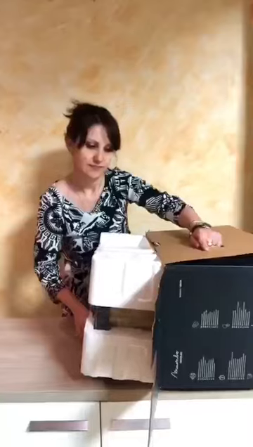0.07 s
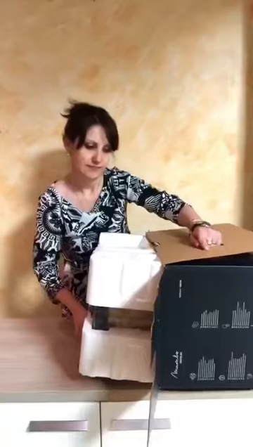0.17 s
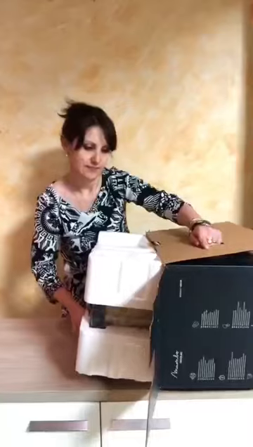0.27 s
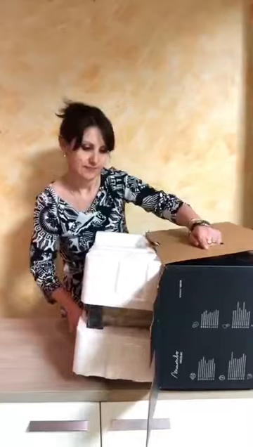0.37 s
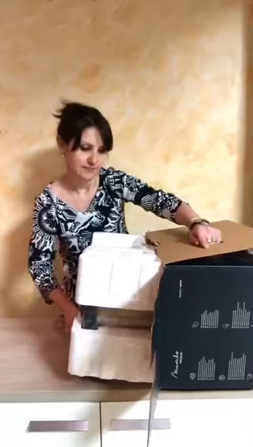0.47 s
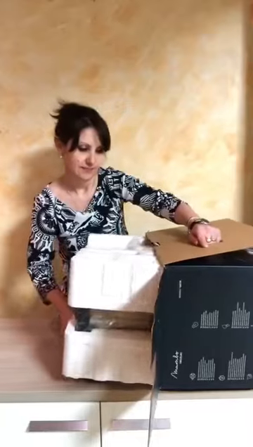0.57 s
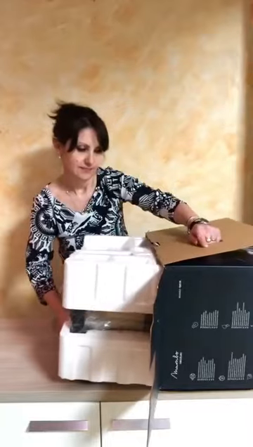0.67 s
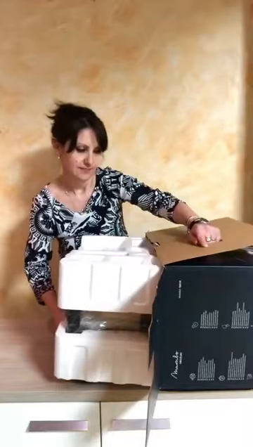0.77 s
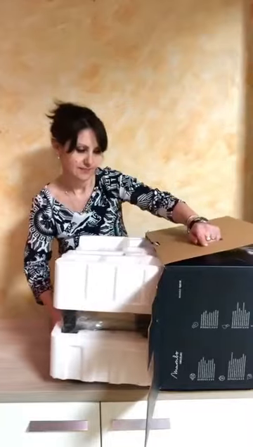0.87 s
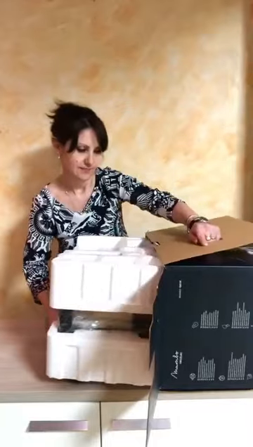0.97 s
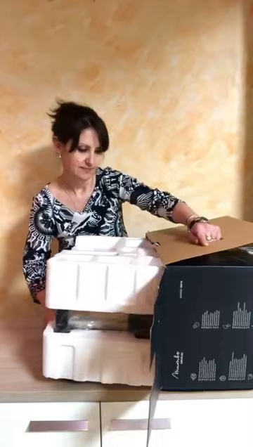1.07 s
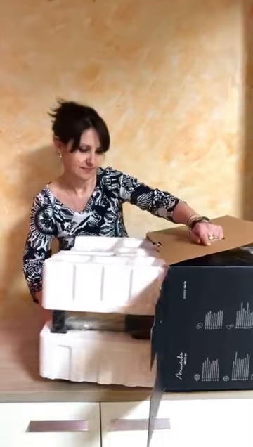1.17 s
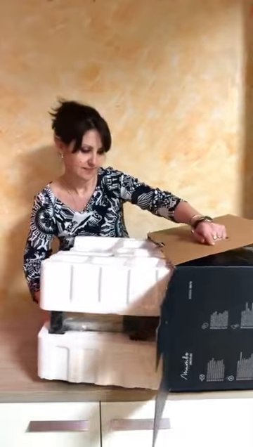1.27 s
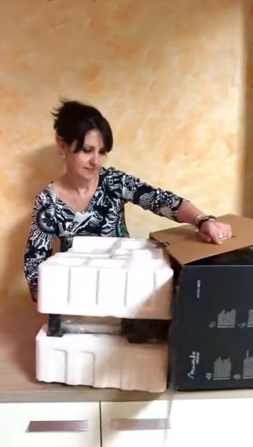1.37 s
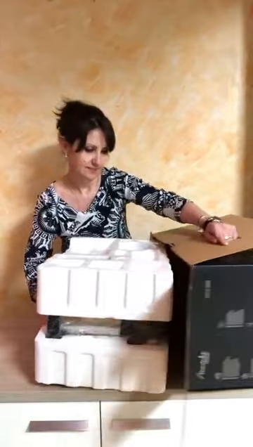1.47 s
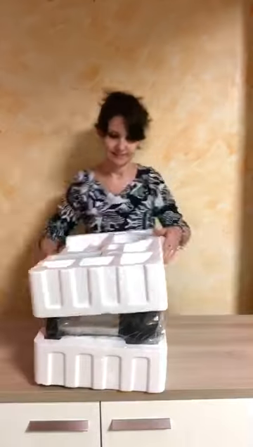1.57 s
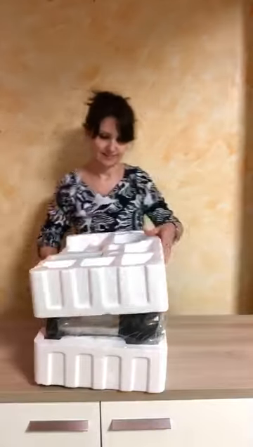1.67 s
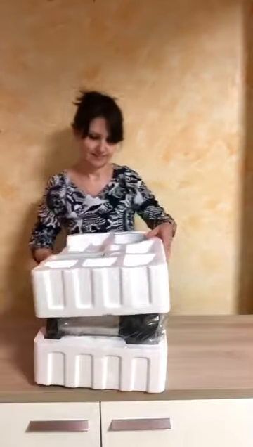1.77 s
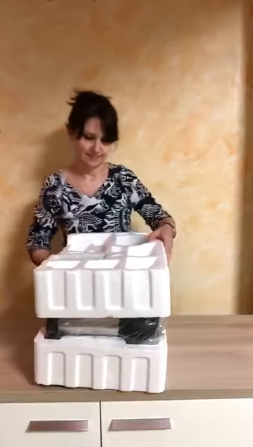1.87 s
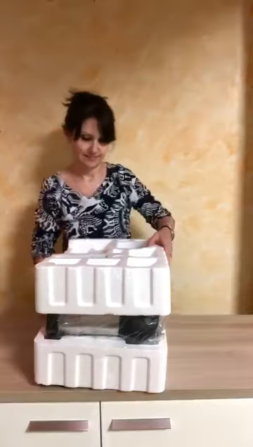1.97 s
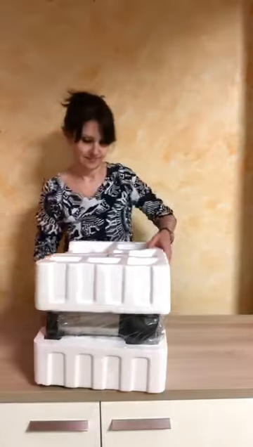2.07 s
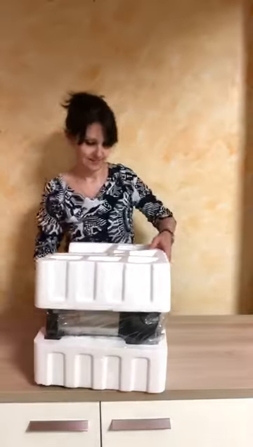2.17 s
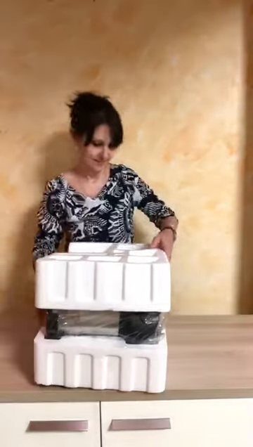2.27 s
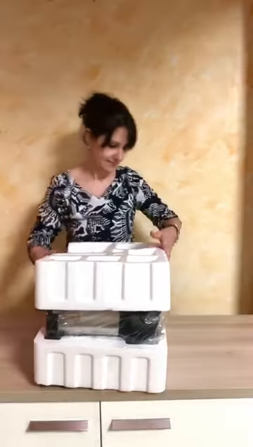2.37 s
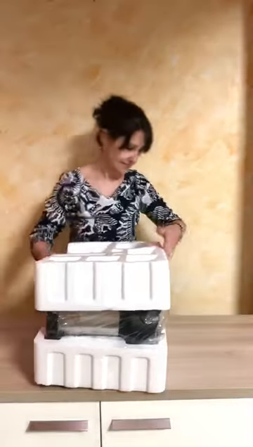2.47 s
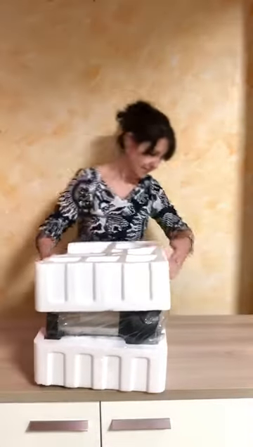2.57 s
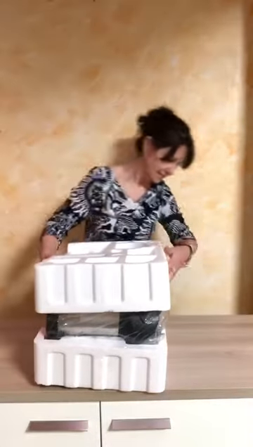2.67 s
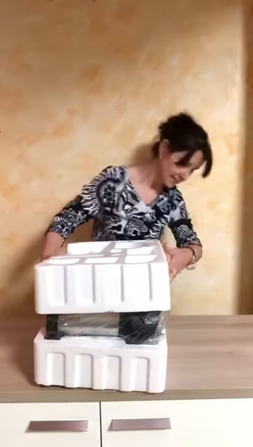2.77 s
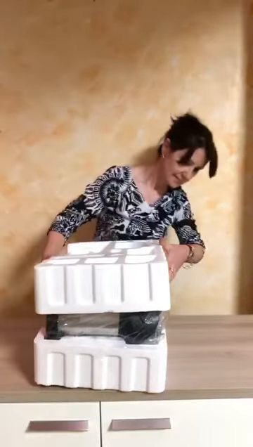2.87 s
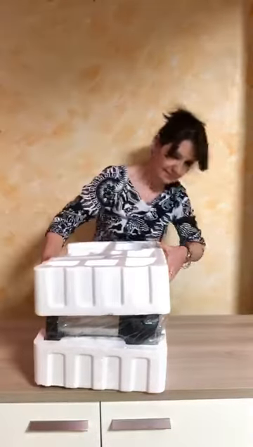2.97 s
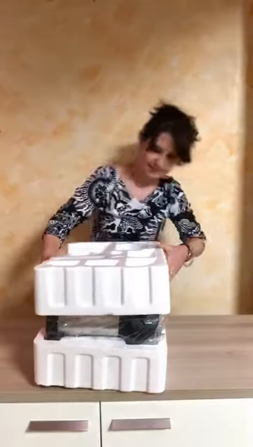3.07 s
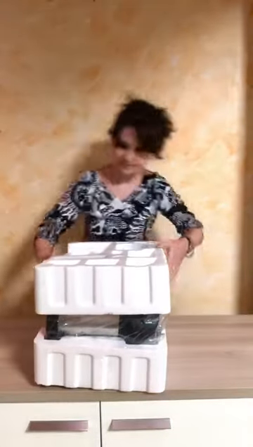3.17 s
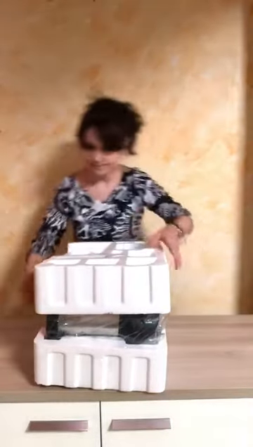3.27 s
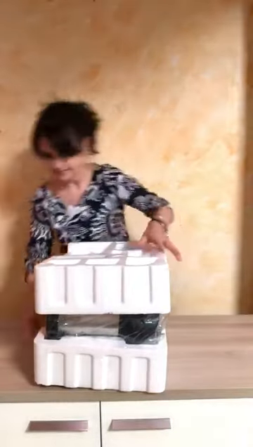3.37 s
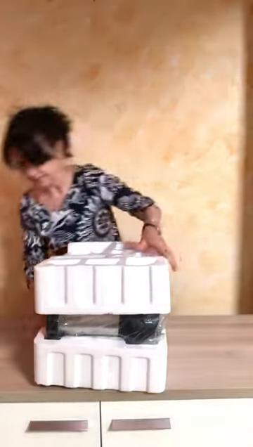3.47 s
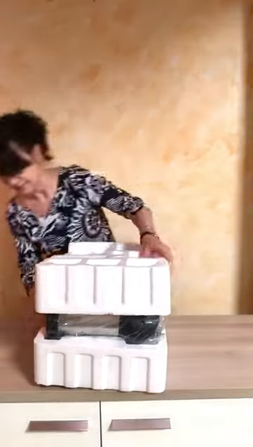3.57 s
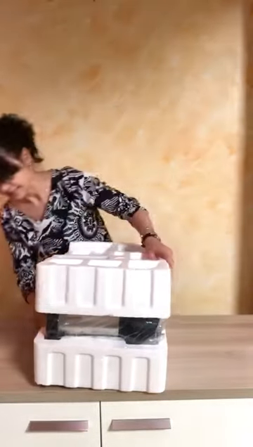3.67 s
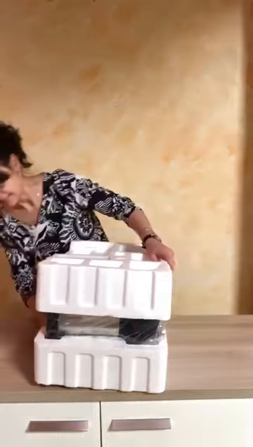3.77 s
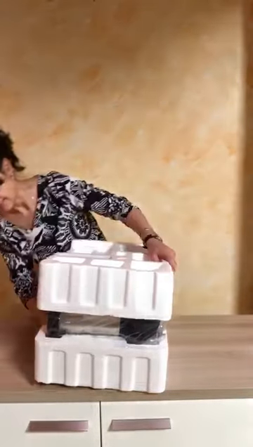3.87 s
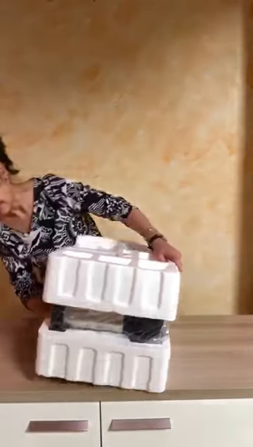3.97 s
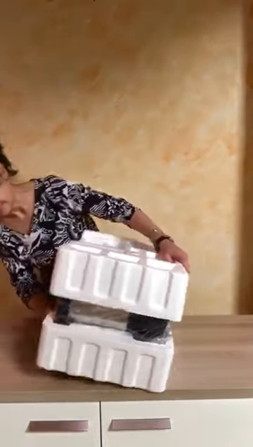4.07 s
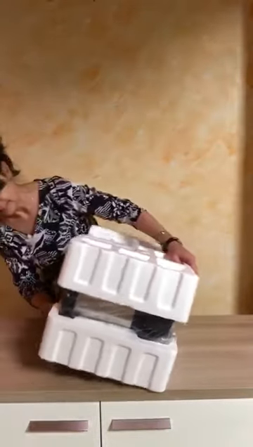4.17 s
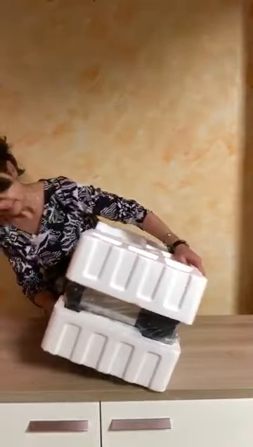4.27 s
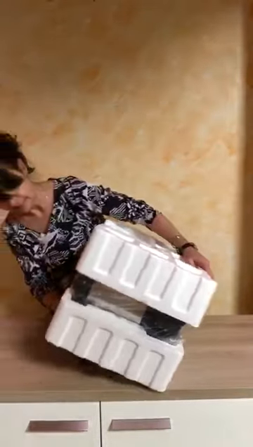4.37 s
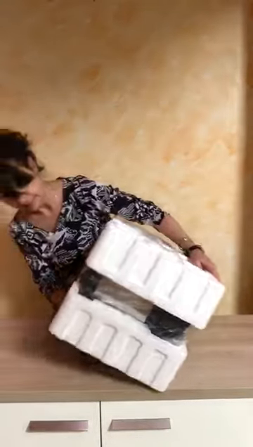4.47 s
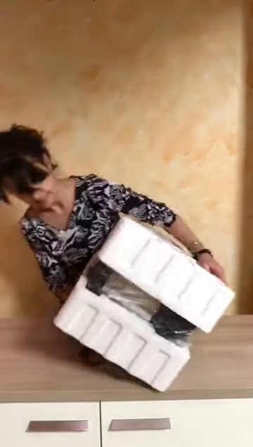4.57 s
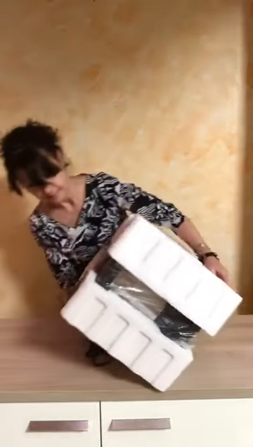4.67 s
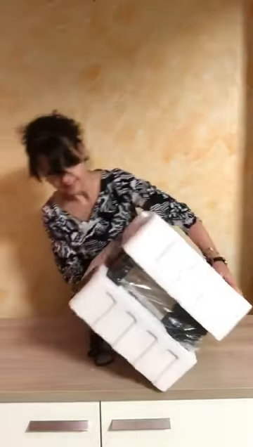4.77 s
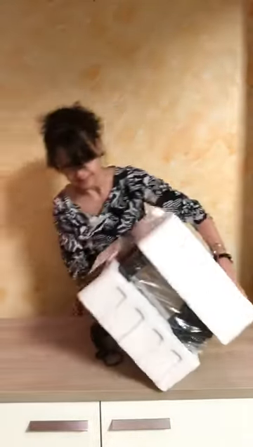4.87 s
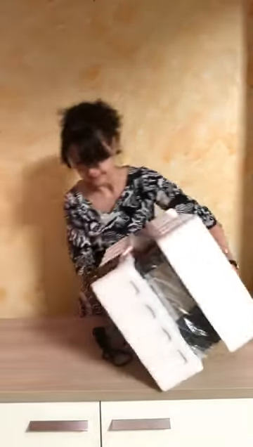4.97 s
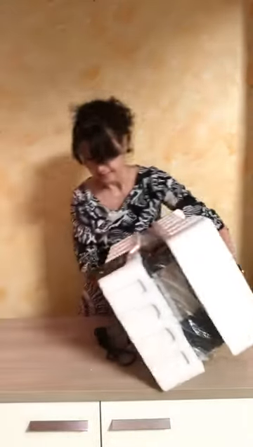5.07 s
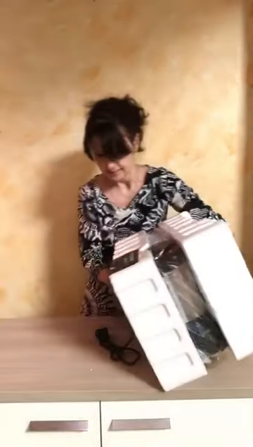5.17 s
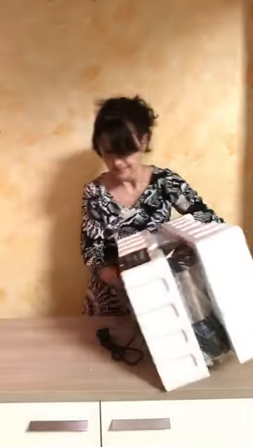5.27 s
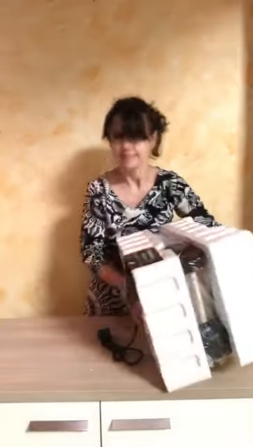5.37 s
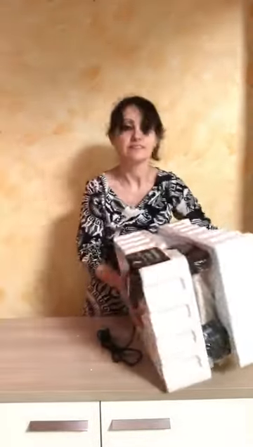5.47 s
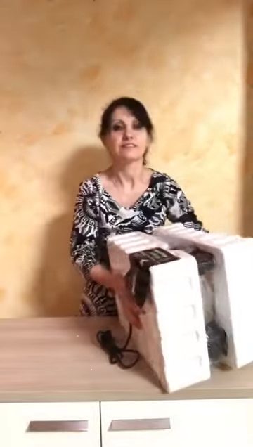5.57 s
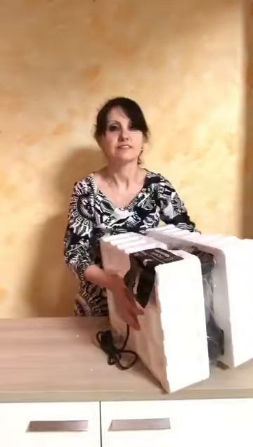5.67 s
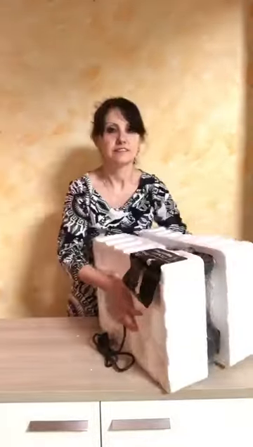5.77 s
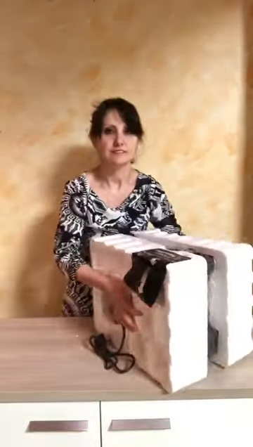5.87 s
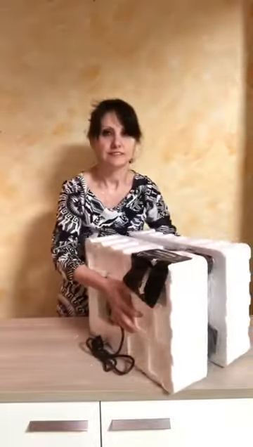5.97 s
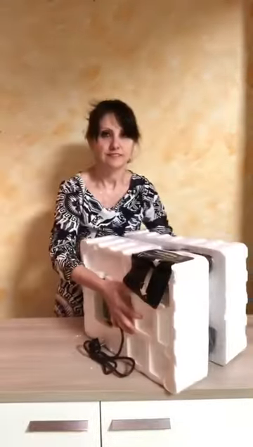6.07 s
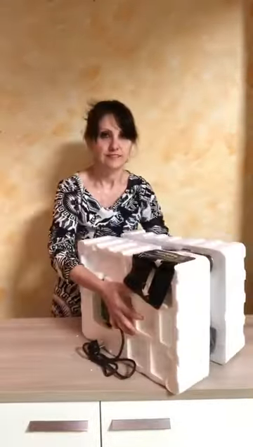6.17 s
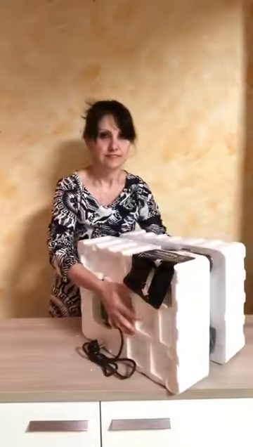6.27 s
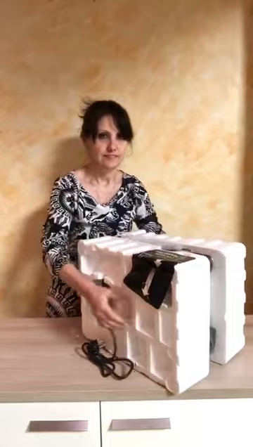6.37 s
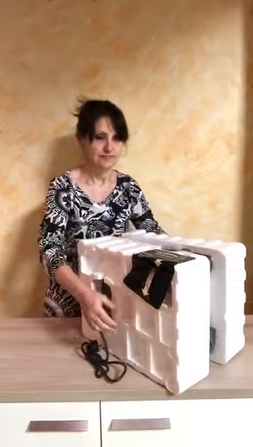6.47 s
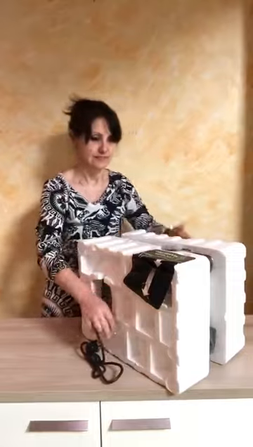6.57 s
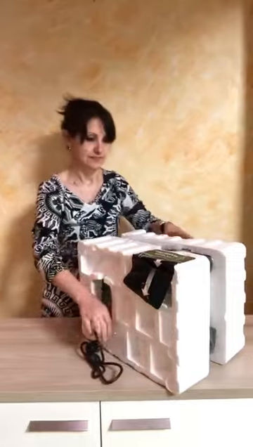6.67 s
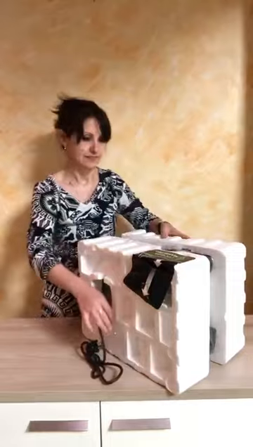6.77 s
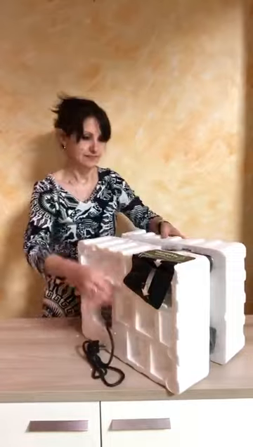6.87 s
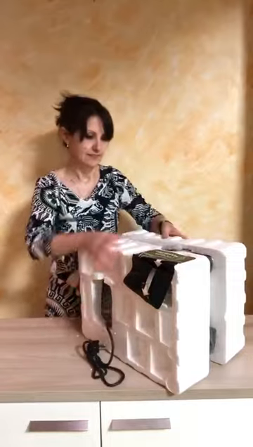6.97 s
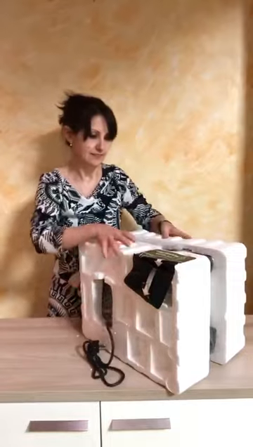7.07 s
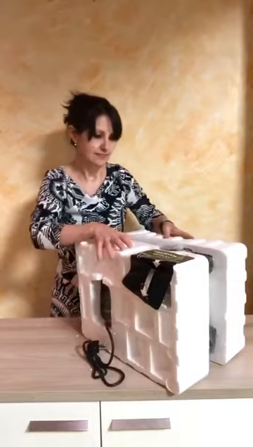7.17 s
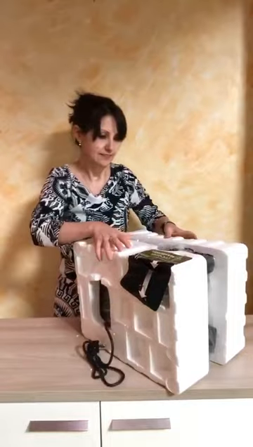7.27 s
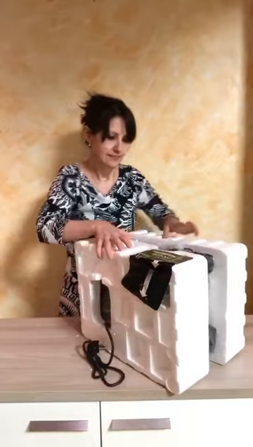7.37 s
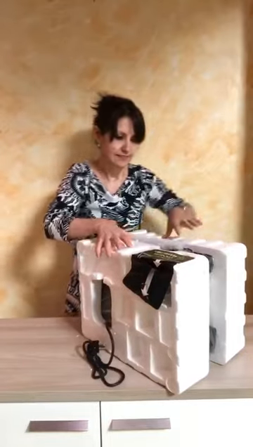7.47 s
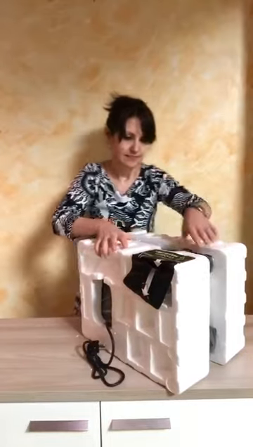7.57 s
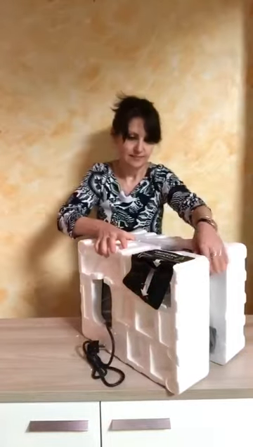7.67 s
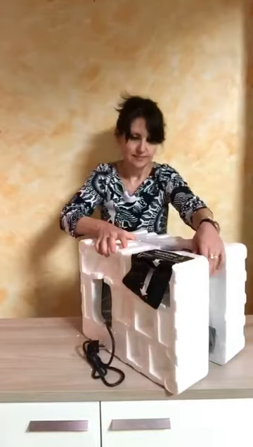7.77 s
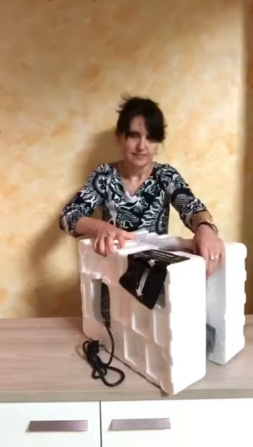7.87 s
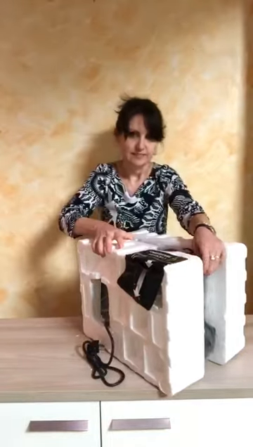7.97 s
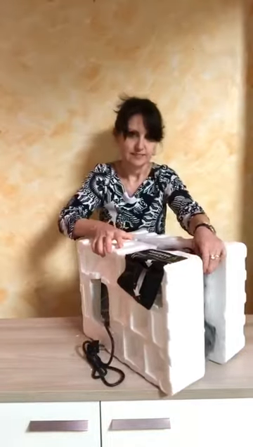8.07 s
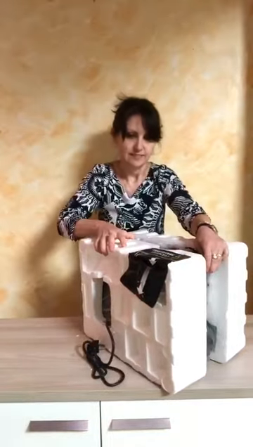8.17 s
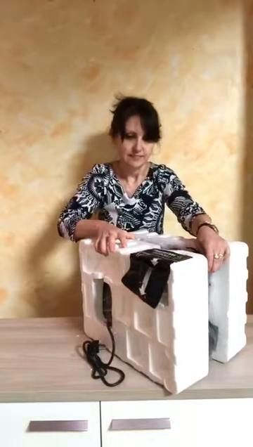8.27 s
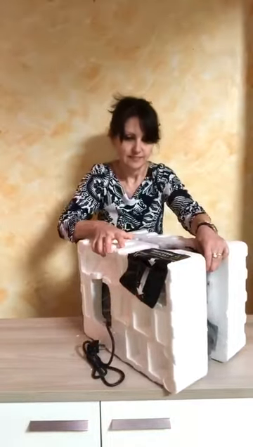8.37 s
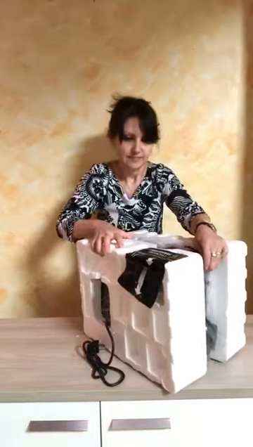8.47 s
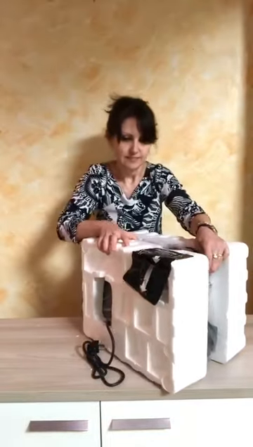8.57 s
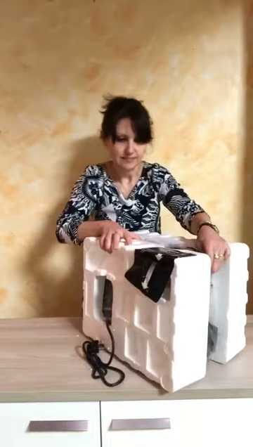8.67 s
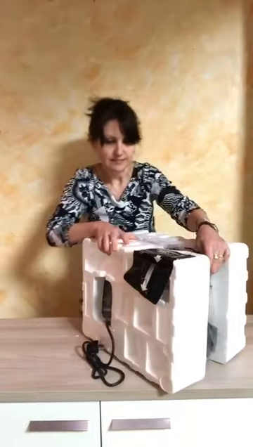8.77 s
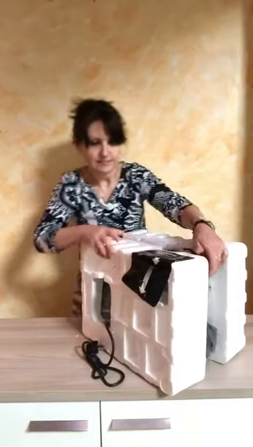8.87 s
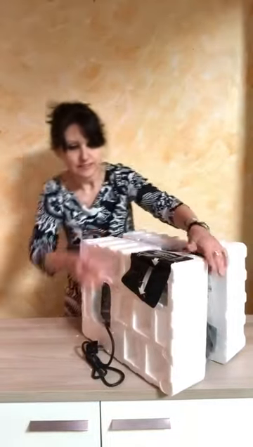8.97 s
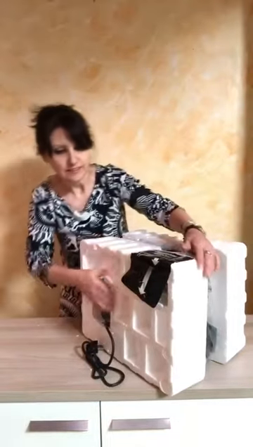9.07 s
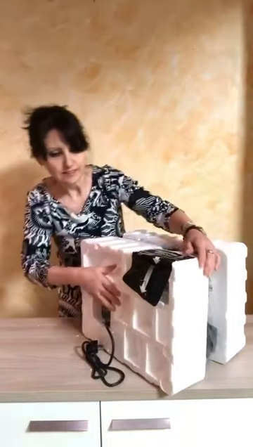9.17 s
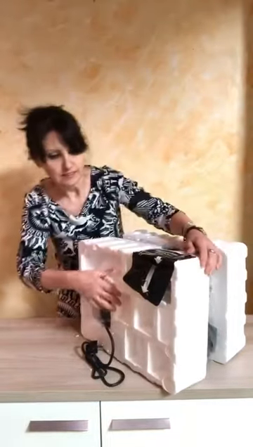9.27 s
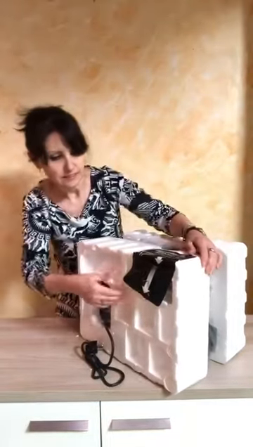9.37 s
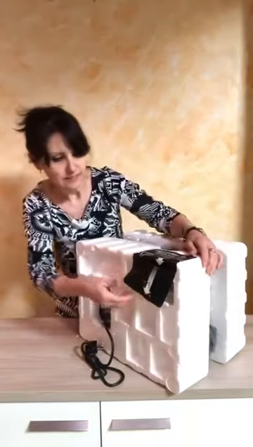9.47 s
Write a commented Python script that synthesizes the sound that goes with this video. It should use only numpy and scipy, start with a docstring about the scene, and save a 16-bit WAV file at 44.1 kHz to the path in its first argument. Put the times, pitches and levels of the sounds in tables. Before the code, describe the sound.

In a small room with hard walls, foam rasps steadily against cardboard until the emptied box lands with a ringing thump, the loudest sound. Quieter handling follows close by: foam rubs and knocks, and plastic wrap crinkles. A foam edge scrapes across a worktop, then the blocks are gripped again, creaking and squeaking faintly while their beads crunch and snap. A faint background noise lies underneath.

```python
"""In a small, hard-walled room, an appliance packed in two foam blocks slides out of its carton.
The empty carton thuds down and its panels ring. The blocks are tipped over, swung round on a worktop
and gripped. Foam rasps as its tiny beads catch and let go, creaks and squeaks when the slips come in
a run, and its beads snap and crunch. The blocks bump and plastic wrap crinkles under the hands.
The walls echo over a faint background noise."""
import sys
import numpy as np
from scipy import signal
from scipy.fft import rfft, irfft
from scipy.io import wavfile

SR = 44100
rng = np.random.default_rng(int(sys.argv[2]) if len(sys.argv) > 2 else 0)


def persist_wave(psi):
    """Save psi, clipped to +-1, as 16-bit WAV."""
    counts = np.round(np.clip(psi, -1, 1) * 32767).astype(np.int16)
    wavfile.write(sys.argv[1], SR, np.atleast_2d(counts).T)


N = 418950
TIME = np.arange(N) / SR
HZ = np.fft.rfftfreq(N, 1 / SR)

# A rub has four bands, low to high: thrum, body, rasp, fizz. body_db and fizz_db are relative to rasp_db.
# Where the bands meet: thrum_to_body_hz, body_to_rasp_hz, rasp_to_fizz_hz
BAND_EDGES_HZ = (380, 1400, 5500)
# The long pull out of the carton: time_s, rasp_db, body_db
PULL = [(0.0, -52.5, 5.5), (0.132, -40.5, -9.5), (0.278, -44.5, -4.5), (0.344, -41, -7.5),
        (1.108, -41.5, -7), (1.128, -41.5, -3.5), (1.178, -37.5, -9.5), (1.34, -39.5, 4),
        (1.376, -37.5, -8), (1.455, -51, 1)]
# The blocks swinging round on one edge: time_s, rasp_db, body_db, fizz_db
SWIVEL = [(4.971, -57.5, -9, -9), (4.988, -55.5, 5, -15), (5.118, -45.5, -9, -0.5), (5.3, -47, -7, -2),
          (5.42, -49.5, -9.5, 7), (5.618, -47.5, -2, 5.5), (5.96, -47.5, -9, -3), (6.06, -49.5, -4, -8),
          (6.14, -48.5, -7, -9), (6.19, -45.5, -8, 2.5), (6.284, -56.5, -9, 2), (6.3, -59, -7, -5)]
# Hands stroking foam and wrap: start_s, rise_s, hold_s, rasp_db, body_db, fizz_db
STROKES = [ (1.46, .005, 0.35, -56.5, -1, 1), (1.737, 0.057, 0.14, -57, 8, 6.5),
           (1.944, 0.032, 0.023, -49, -1.5, 1), (2.038, 0.11, 0.17, -51.5, -9, -2),
           (2.278, 0.076, 0.023, -51.5, -5.5, 3), (2.464, 0.027, 0.077, -53, 3.5, -5.5),
           (2.582, 0.044, .02, -54.5, -13, -3), (2.705, 0.044, 0.012, -53.5, -3, 1),
           (2.802, 0.068, 0.053, -53.5, -2.5, -2), (2.932, 0.16, 0.025, -54, -6.5, -1),
           (3.324, 0.014, 0.11, -53, -12, -3), (3.425, 0.12, 0.03, -47.5, -8, -3.5),
           (3.594, 0.11, 0.12, -51, -3, -1), (3.84, .005, 0.033, -51, -1, 3.5),
           (3.88, 0.051, 0.14, -53, -3, -8), (4.087, 0.089, 0.13, -54.5, -1.5, 4),
           (4.34, 0.048, 0.22, -59.5, 3, 2.5), (4.52, .025, 0.017, -54, -5, -7),
           (4.657, 0.056, 0.034, -52, -2, 2.5), (4.709, 0.051, 0.012, -47.5, -7, 3.5),
           (4.81, 0.029, 0.063, -57, -0.5, -4), (6.298, .02, 0.064, -71, -16, 4),
           (6.454, .005, 0.22, -60, -3, 2), (6.727, 0.015, 0.017, -55, -1.5, -2.5),
           (6.81, 0.12, .07, -62, -12, -1), (6.934, 0.025, 0.009, -48.5, -6, -1),
           (7.013, 0.034, 0.12, -53, -10, -2.5), (7.17, 0.015, 0.045, -58.5, 2, -8),
           (7.215, 0.12, 0.04, -51, -20, -4.5), (7.366, 0.013, 0.036, -48, -8.5, -7),
           (7.44, 0.027, 0.23, -54, -0.5, -2.5), (7.677, 0.057, 0.078, -53, -4, 0),
           (7.9, 0.084, 0.093, -66.5, 2, -4), (8.055, 0.053, 0.043, -57.5, -8, -10),
           (8.253, 0.0088, 0.041, -53.5, -4, -8), (8.409, 0.083, 0.013, -47, -8.5, -6),
           (8.557, 0.18, 0.036, -49, -5.5, -1), (8.788, 0.016, 0.016, -55.5, -5.5, 3.5),
           (8.979, 0.026, 0.011, -51, -0.5, -25), (9.05, 0.042, 0.018, -51, -5.5, -11),
           (9.131, 0.039, 0.013, -47, -9.5, -8.5), (9.231, 0.056, 0.0088, -46.5, -11.5, -19),
           (9.392, 0.084, .03, -53.5, -5.5, -14)]
# Tone of foam on cardboard: frequency_hz, level_db
CARDBOARD_TONE = [(35, -35), (60, -16), (242, -9), (277, -10), (323, -11.5), (395, -6.5), (504, -11.5),
                  (719, -5.5), (858, -7.5), (980, -4), (1310, -6.5), (2130, -3), (5900, -2.5), (7600, -1.5),
                  (8300, -4), (11200, -5), (12000, -15), (15600, -52), (22000, -120)]
# Tone of foam on the worktop: frequency_hz, level_db
WORKTOP_TONE = [(35, -43), (82, -7), (200, -2), (350, 5), (1900, 0), (2800, -1.2), (3600, 0), (5100, -1.5),
                (6400, -2.5), (7700, -0.5), (11200, -1.5), (12000, -12), (15600, -45), (22000, -120)]
# Tone of hands on foam: frequency_hz, level_db
HAND_TONE = [(35, -43), (60, -23), (82, -3), (114, -12), (149, -5), (182, -10.5), (222, -1.5), (290, -4.5),
             (370, 0.5), (422, 0.5), (515, -2), (858, 1.5), (1350, 2), (2720, 2), (9200, 0), (11200, -1.5),
             (12000, -10), (15600, -43), (22000, -120)]
# Hollows in the blocks: pitch_hz, width_hz, level_db
HOLLOWS = [(236, 45, 7), (416, 64, -20), (596, 120, 10), (777, 200, -7), (1070, 150, 1.5),
           (1830, 1900, -19), (5150, 438, -34)]
# The carton's edges landing: time_s, level_db
LANDINGS = [(1.654, -24), (1.6561, -17), (1.6582, -10.5), (1.671, -24), (1.681, -22), (1.707, -26),
            (1.839, -39), (1.869, -34)]
# The carton rocking back and landing again: time_s, level_db
REBOUND = (1.866, -33)
# Notes of its panels (a ring time is how long a 60 dB fade takes): pitch_hz, level_db, ring_s
PANEL_NOTES = [(78.6, -14.5, 0.42), (145, -14, 0.3), (215, 2, 0.23), (231.7, -3.5, 0.42), (345, -7, 0.3),
               (373, 0.5, 0.34), (434, -1, 0.17), (586, 3, 0.25), (682, 5, 0.15), (750, -6, 0.39),
               (789, 2.5, 0.31), (820, -6, 0.23), (1018, -9, 0.48), (1188, -6, 0.39), (1220, -8, 0.42),
               (1470, -28, 0.12), (1620, -6, 0.22), (2309, -19, 0.11), (2970, -9, 0.19), (3214, -10, 0.36),
               (4410, -16, 0.092)]
# Tone of its slap: frequency_hz, level_db
SLAP_TONE = [(60, -18), (120, -1), (200, 0), (400, 5), (720, 10.5), (1000, 6.5), (1400, 3.5), (2100, -4.5),
             (3000, -6), (3500, -9.5), (4200, -9), (7000, -16), (12000, -30)]
# Beads and wrap snapping: time_s, level_db, pitch_hz, crumble_db (relative to the snap)
SNAPS = [(3.68, -35, 4640, -4.5), (3.689, -45, 3200, -5), (3.832, -35, 3540, -1), (3.839, -30, 7200, -7),
         (3.856, -37, 5000, -13), (3.917, -36, 6400, -4), (4.455, -37, 2320, -16),
         (4.515, -47.5, 4590, 4.5), (6.734, -32.5, 6000, -17), (6.954, -32.5, 3750, -10),
         (6.963, -40, 2600, -15), (6.972, -38, 3730, -21), (6.984, -32, 7000, -20),
         (7.103, -20.5, 8200, -15), (7.553, -30.5, 2600, -3.5), (7.608, -27.5, 6650, -14),
         (7.735, -32, 2540, -17), (7.7746, -17, 7560, -14.5), (8.112, -44, 3600, 0), (8.14, -34, 2130, -9),
         (8.199, -39.5, 4200, -2), (8.218, -35, 4560, -5.5), (8.26, -34.5, 4100, -5.5),
         (8.282, -32, 6700, -12), (8.297, -39, 2110, -5), (8.996, -34.5, 3380, -5.5),
         (9.163, -40, 4330, -23)]
# Blocks bumping the worktop and palms: time_s, level_db, pitch_hz
BUMPS = [(1.946, -35, 550), (1.968, -27, 695), (2.19, -46, 220), (2.259, -28, 880), (2.33, -46, 235),
         (2.477, -35, 505), (2.515, -40, 240), (2.558, -37, 234), (2.765, -27, 940), (2.81, -29, 610),
         (3.418, -27.5, 740), (3.681, -30.5, 645), (3.835, -35, 780), (4.286, -41, 312), (4.455, -23, 870),
         (4.518, -38, 440), (4.562, -40.5, 225), (6.08, -27, 1000), (6.631, -41.5, 384), (6.745, -36, 710),
         (6.968, -44, 157), (7.031, -45, 243), (7.025, -22.5, 1030), (7.036, -31, 710), (7.182, -26, 1110),
         (7.193, -37, 456), (7.375, -38, 650), (7.561, -44, 292), (7.559, -22, 553), (7.735, -21.5, 874),
         (8.142, -35.5, 600), (8.2, -29, 940), (8.262, -33, 540), (8.48, -33, 570), (8.487, -35, 298),
         (8.985, -32, 418), (8.99, -39, 155), (9.035, -51, 205), (9.16, -41.5, 206), (9.165, -24, 1010),
         (9.275, -34, 694)]
# Foam crunching in a tight grip: start_s, length_s, level_db, pitch_hz
CRUNCHES = [(3.683, 0.006, -31, 1510), (3.688, 0.004, -34, 1900), (3.699, 0.12, -42.5, 1710),
            (3.832, 0.008, -30, 1780), (3.851, 0.02, -36, 2550), (6.967, 0.012, -41.5, 1900),
            (7.103, 0.0053, -36, 1900), (7.553, 0.0033, -29.5, 1490), (8.262, 0.0036, -42, 2400),
            (8.276, 0.034, -48, 1900)]
# Foam sticking and slipping: start_s, length_s, level_db, pitch_hz, slips_per_s
CREAKS = [(3.764, 0.049, -48.5, 626, 144), (3.835, 0.016, -49, 1800, 450), (4.418, 0.04, -46, 932, 260),
          (5.559, 0.093, -48, 920, 325), (5.629, 0.1, -49, 398, 56), (7.48, 0.27, -49.5, 1140, 315),
          (7.579, 0.13, -49, 1370, 260), (8.609, 0.087, -46, 820, 270), (8.666, 0.088, -47, 1370, 300),
          (8.689, 0.095, -50, 1870, 290)]
# Fingertips squeaking on foam: start_s, length_s, level_db, start_hz, end_hz
SQUEAKS = [(4.417, 0.052, -42, 867, 899), (4.535, 0.029, -44.5, 543, 430), (5.88, 0.19, -58, 453, 428),
           (7.45, 0.11, -54, 790, 780), (7.732, 0.034, -43.5, 830, 784), (8.69, 0.1, -52.5, 609, 580)]
# Hiss from the gap under the dragging edge: time_s, pitch_hz, level_db
EDGE_HISS = [(5.08, 4400, -59), (5.25, 4540, -59), (5.42, 4850, -54), (5.62, 4930, -56), (5.78, 5200, -63),
             (5.95, 5300, -60)]
# How long the room echoes: frequency_hz, ring_s
ROOM_RING = [(100, 1), (400, 0.94), (1000, 0.44), (3000, 0.86), (8000, 0.47), (12000, 0.57)]
# Tone of the still room: frequency_hz, level_db
AIR_TONE = [(21, -45), (35, -22), (134, -3.5), (163, -4), (348, -2.5), (760, -6), (1540, -7), (2580, -15),
            (3290, -18), (5230, -19.5), (12000, -29), (15600, -50), (22000, -120)]


def rubbing(gains, tone, slips_per_s, spread_db, judder_db, hollow_db, patchy_db, scrape_db):
    """Thousands of beads catch and let go; their slips hiss at the surface and shake the hollow block."""
    slips = random_ticks(slips_per_s)
    slips *= from_db(spread_db * np.minimum(rng.exponential(1, N), 5))
    slips *= from_db(judder_db * wander(53))  # the grip tightens and eases
    slips = shifting_contact(slips, patchy_db, patch_s=0.09, patch_hz=131, fade_hz=5640)
    slips = shifting_contact(slips, scrape_db, patch_s=0.055, patch_hz=600, fade_hz=9000)
    hollows = sum(from_db(db) / (1 + (2 * (HZ - hz) / width) ** 2) for hz, width, db in HOLLOWS)
    spectrum = rfft(slips) * from_db(look_up(tone, HZ)) * (1 + from_db(hollow_db) * hollows)
    share_below = [0] + [1 / (1 + (HZ / hz) ** 6) for hz in BAND_EDGES_HZ] + [1]
    bands = [irfft(spectrum * np.sqrt(abs(hi - lo)), N) for lo, hi in zip(share_below, share_below[1:])]
    return sum(gain * unit_level(band) for gain, band in zip(gains, bands))


def shifting_contact(x, depth_db, patch_s, patch_hz, fade_hz):
    """The touching area keeps moving, so patches of pitch swell and fade, mostly below fade_hz."""
    hz, _, frames = signal.stft(x, SR, nperseg=1024, noverlap=768)
    patches = rng.standard_normal(frames.shape)
    for axis, width in enumerate((patch_hz * 1024 / SR, patch_s * SR / 256)):
        bell = signal.windows.gaussian(61, width / 2)
        patches = signal.fftconvolve(patches, np.expand_dims(bell, 1 - axis), "same")
    gain = from_db(depth_db * unit_level(patches) / (1 + (hz[:, None] / fade_hz) ** 2))
    return signal.istft(frames * gain, SR, nperseg=1024, noverlap=768)[1][:N]


def pull_gains(inside_db=-23.5, mouth_db=1.5, swell_s=0.13):
    """Band gains as foam slides out: the carton thrums more as the foam nears its mouth."""
    s, rasp, body = np.transpose(PULL)
    rasp, body = np.interp(TIME, s, rasp), np.interp(TIME, s, body)
    fizz = np.interp(TIME, [s[0], s[-1]], [-16.5, -5.5])  # muffled until the foam is out
    thrum = inside_db + (mouth_db - inside_db) * np.exp(-abs(TIME - s[-1]) / swell_s)
    return touching(s) * from_db([rasp + thrum, rasp + body, rasp, rasp + fizz])


def swivel_gains(body_db):
    """Band gains as a foam edge drags round on the worktop."""
    s, rasp, body, fizz = np.transpose(SWIVEL)
    levels = band_levels(s, rasp, body + body_db, fizz)
    return touching(s) * from_db([np.interp(TIME, s, db) for db in levels])


def stroke_gains(slowing_db_per_s=135):
    """Band gains of the hands: each stroke speeds up, holds and dies away as the hand slows."""
    t, power = np.arange(SR) / SR, np.zeros((4, N))
    for s, rise, hold, *press in STROKES:
        speed = np.sin(np.pi / 2 * np.clip(t / rise, 0, 1))
        speed *= from_db(-slowing_db_per_s * np.maximum(t - rise - hold, 0))
        for band, db in zip(power, band_levels(s, *press)):
            add(band, s, (from_db(db) * speed) ** 2)
    return np.sqrt(power)


def band_levels(s, rasp_db, body_db, fizz_db, upright_s=6.4):
    """Thrum, body, rasp and fizz in dB: a flat palm, hollow and dull, shakes the whole block."""
    thrum_db = np.where(s < upright_s, -16.5, -11)  # on edge, the blocks thrum more freely
    thrum_db = thrum_db + 0.59 * body_db - 0.36 * fizz_db
    return rasp_db + np.array([thrum_db, body_db, np.zeros_like(rasp_db), fizz_db])


def touching(s, touch_s=0.036, leave_s=0.017):
    """1 while the surfaces touch, from the first time in s to the last."""
    return np.interp(TIME, [s[0] - touch_s, s[0], s[-1], s[-1] + leave_s], [0, 1, 1, 0])


def carton_thud(panel_db=-15.5, slap_db=-1.5, flap_db=6.5, flap_s=0.0034, room_db=8, build_cycles=0.84):
    """Each edge that lands slaps and rattles the flaps; the heaviest rings the panels and the room."""
    t, out = np.arange(SR) / SR, np.zeros(N)
    slap = np.pad(click(SLAP_TONE), (0, SR))[:SR]
    for s, db in LANDINGS:
        flaps = signal.fftconvolve(noise_burst(t, flap_s), slap)[:SR]
        flaps *= from_db(flap_db) * np.linalg.norm(slap) / np.linalg.norm(flaps)
        add(out, s, from_db(db + slap_db) * (slap + flaps))
    panels = np.zeros(SR)
    for k, (hz, db, ring_s) in enumerate(PANEL_NOTES):
        build_up = 1 - np.exp(-t * hz / build_cycles)
        panels += (-1) ** k * from_db(db) * ring(t, hz, ring_s) * build_up
    heavy_s, heavy_db = max(LANDINGS, key=lambda landing: landing[1])
    for s, db in ((heavy_s, heavy_db), REBOUND):
        add(out, s, from_db(db + panel_db) * panels)
    add(out, heavy_s, from_db(heavy_db + room_db) * room_echo(slap))
    return out


def snaps(level_db, burst_s=0.001, width_octaves=0.41, crumble_s=0.007, rise_s=0.00047, delay_s=0.0018):
    """A bead snaps: a bright burst, a crumble of small slips and a knock in the block."""
    t, freqs, out = np.arange(2048) / SR, np.fft.rfftfreq(2048, 1 / SR), np.zeros(N)
    knock = from_db(-40) * ring(t, hz=980, ring_s=0.0058)
    for s, db, hz, crumble_db in SNAPS:
        octaves = np.log2(hz / 4000)
        bright_db = 3.5 * octaves  # small, high beads snap more brightly
        crack = click([(200, -8), (800, 0.5), (3000, -0.5),
                       (8000, bright_db - 0.5), (12000, bright_db - 5.5)])
        slips = noise_burst(t, crumble_s) * (1 - np.exp(-t / rise_s))
        crumble = from_db(crumble_db + 1.5 * octaves) * signal.fftconvolve(slips, crack)[:len(t)]
        band_db = np.maximum(-12 * (np.log2((freqs + 1) / hz) / width_octaves) ** 2, -35)
        ping = click(np.transpose([freqs, band_db]))
        burst = signal.fftconvolve(noise_burst(t, burst_s), ping)[:len(t)]
        burst *= 3.84 / np.linalg.norm(burst)
        add(out, s + delay_s, from_db(db + level_db) * (burst + crumble + knock))
    return cut_bass(out, hz=260)


def bumps(level_db, ring_cycles=11.4, rise_s=0.005, scuff_db=-4, scuff_s=0.0098):
    """A soft blow rings a few quickly dying notes in the foam and scuffs its surface."""
    t, out = np.arange(SR // 4) / SR, np.zeros(N)
    notes = [(0.62, -7), (1, -2), (1.47, -5.5), (2.3, -30)]  # pitch_ratio, level_db
    for s, db, hz in BUMPS:
        blow = sum(from_db(note_db) * ring(t, hz * ratio, ring_cycles / hz) for ratio, note_db in notes)
        blow *= 1 - np.exp(-t / rise_s)
        scuff = resonate(noise_burst(t, scuff_s), hz, 2 * hz)
        scuff *= from_db(scuff_db) * np.linalg.norm(blow) / np.linalg.norm(scuff)
        add(out, s, from_db(db + level_db) * cut_bass(blow + scuff, 0.46 * hz))
    return out


def crunches(level_db, beads_per_s=1700, spread_db=20):
    """A patch of beads collapses in a quick, uneven run and rings the foam around it."""
    out = np.zeros(N)
    for s, length, db, hz in CRUNCHES:
        size = round(length * SR)
        chance, strength, sign = rng.random((3, SR // 4))[:, :size]
        beads = (chance < beads_per_s / SR) * np.sign(sign - 0.5) * from_db(spread_db * strength)
        crack = click([(150, -30), (550, -6), (1000, -5), (hz, 1), (5000, -7), (12000, -17)])
        sound = signal.fftconvolve(beads, crack)
        sound += from_db(-1) * resonate(sound, hz, width_hz=230)
        add(out, s, from_db(db + level_db) * sound / np.sqrt(np.sum(sound ** 2) / size + 1e-12))
    return out


def creaks(level_db, jitter=0.5, ring_s=0.021):
    """An uneven run of slips rings one patch of foam."""
    t, out = np.arange(1024) / SR, np.zeros(N)
    unsteady = np.exp(jitter * wander(202.5))
    for s, length, db, hz, slips_per_s in CREAKS:
        size = round(length * SR)
        rate = slips_per_s * unsteady[round(s * SR):][:size]
        slips = np.diff(np.floor(np.cumsum(rate) / SR), prepend=-1)
        slips *= signal.windows.tukey(size + 200, 0.5)[100:-100]
        patch = ring(t, hz, ring_s) + 0.5 * ring(t, 1.493 * hz, ring_s)
        sound = signal.fftconvolve(slips, patch)
        add(out, s, from_db(db + level_db) * sound / np.sqrt(np.sum(sound ** 2) / size + 1e-12))
    return cut_bass(out, hz=300)


def squeaks(level_db, octave_db=-19, waver=0.015, flutter_db=4.5):
    """Fingertips slip almost regularly and sing faint, rough notes that glide, swell and fade."""
    out = np.zeros(N)
    drift, grip = 1 + waver * wander(68), from_db(flutter_db * wander(45))
    for s, length, db, start_hz, end_hz in SQUEAKS:
        size, at = round(length * SR), round(s * SR)
        pitch_hz = np.linspace(start_hz, end_hz, size) * drift[at:at + size]
        phase = 2 * np.pi * np.cumsum(pitch_hz) / SR
        note = np.sin(phase) + from_db(octave_db) * np.sin(2 * phase)
        swell = signal.windows.tukey(size, 0.5) * grip[at:at + size]
        add(out, s, from_db(db + level_db) * swell * note)
    return out


def wrap_crinkle(hand_gain, level_db, folds_per_s=190, spread_db=10, clump_db=2.5):
    """Plastic wrap buckles in dry, uneven clumps of ticks under the moving hands."""
    folds = random_ticks(folds_per_s) * from_db(spread_db * rng.random(N) + clump_db * wander(25))
    tick = click([(300, -23), (1200, 5.5), (3000, 5), (6000, 5), (12000, -7)], size=256)
    return from_db(level_db) * hand_gain * unit_level(signal.oaconvolve(folds, tick)[:N])


def edge_hiss(width_hz=790, waver=0.023, judder_db=0.5):
    """Bead noise sings in the gap between foam and worktop, rising as the blocks swing round."""
    s, hz, db = np.transpose(EDGE_HISS)
    pitch_hz = np.interp(TIME, s, hz) * (1 + waver * wander(12))
    hiss = resonate(resonate(rng.standard_normal(N), pitch_hz, width_hz), pitch_hz, width_hz)
    return touching(s) * from_db(np.interp(TIME, s, db) - judder_db * wander(40)) * unit_level(hiss)


def room_echo(x, gap_s=0.0044):
    """Sound bounces between the walls, each pitch range dying at its own speed."""
    bounces = rng.choice([-1., 1.], SR) * (rng.random(SR) < 0.12) * (np.arange(SR) > gap_s * SR)
    hz, t, frames = signal.stft(bounces, SR, nperseg=256)
    fade = np.exp(-np.log(1000) * t / look_up(ROOM_RING, hz)[:, None])
    fade *= 1 + 1.13 * np.exp(-t / 0.047)  # near walls and the worktop crowd the first moments
    tail = signal.istft(frames * fade, SR, nperseg=256)[1]
    return signal.fftconvolve(x, tail / np.linalg.norm(tail))[:N]


def moving_echo(x, turns_per_s, count=3):
    """The rubbing spot keeps moving, so its sound passes from one set of echoes to the next."""
    place = TIME * turns_per_s * count
    shares = [np.sin(np.pi / 2 * np.minimum((place + k) % count, 2)) for k in range(count)]
    return sum(room_echo(x * share) for share in shares)


def still_air(level_db, drone_db, drone_hz):
    """Faint background noise with a low drone in it."""
    noise = rfft(rng.standard_normal(N))
    air = unit_level(irfft(noise * from_db(look_up(AIR_TONE, HZ)), N))
    drone = unit_level(irfft(noise / (1 + ((HZ - drone_hz) / 7) ** 2), N))
    return from_db(level_db) * air + from_db(drone_db) * drone


def from_db(db):
    """Turns decibels into a gain."""
    return 10 ** (np.asarray(db) / 20)


def unit_level(x):
    """Scales x to an average (rms) level of 1."""
    return x / np.sqrt(np.mean(x ** 2) + 1e-20)


def look_up(points, hz):
    """Reads between a table's rows on a log-frequency scale."""
    freqs, values = np.transpose(points)
    return np.interp(np.log(hz + 1), np.log(freqs + 1), values)


def add(mix, s, sound):
    """Mixes a sound in at s seconds."""
    part = mix[max(round(s * SR), 0):][:len(sound)]
    part += sound[:len(part)]


def ring(t, hz, ring_s):
    """One note that fades by 60 dB in ring_s."""
    return np.sin(2 * np.pi * hz * t) * np.exp(-np.log(1000) * t / ring_s)


def noise_burst(t, fade_s):
    """A puff of noise that dies away."""
    return rng.standard_normal(len(t)) * np.exp(-t / fade_s)


def random_ticks(per_s):
    """Tiny pushes and pulls at random moments."""
    return (rng.random(N) < per_s / SR) * rng.choice([-1., 1.], N)


def click(tone, size=2048):
    """The shortest click with this tone (rows of frequency_hz, level_db), peaking at 1."""
    log_gain = np.log(from_db(look_up(tone, abs(np.fft.fftfreq(size, 1 / SR)))))
    pulse = np.fft.ifft(np.exp(np.conj(signal.hilbert(log_gain)))).real
    return pulse / abs(pulse).max()


def wander(rate_hz):
    """A smooth random wobble, mostly slower than rate_hz."""
    return unit_level(irfft(rfft(rng.standard_normal(N)) / (1 + (HZ / rate_hz) ** 2), N))


def resonate(x, hz, width_hz):
    """Keeps the sound near a pitch, which may be steady or gliding."""
    turn = np.exp(2j * np.pi * np.cumsum(hz * np.ones(len(x))) / SR)
    decay = np.exp(-np.pi * width_hz / SR)
    return 2 * (turn * signal.lfilter([1 - decay], [1, -decay], x / turn + 1e-18)).real


def cut_bass(x, hz):
    """A light foam block gives off little sound below its own notes."""
    return signal.sosfilt(signal.butter(2, hz, "high", fs=SR, output="sos"), x)


def scene():
    """Mixes rubbing, thud, snaps and foam noises with the room, the same in both channels."""
    slide = rubbing(from_db(-0.5) * pull_gains(), CARDBOARD_TONE, slips_per_s=14000,
                    spread_db=1, judder_db=0.3, hollow_db=-31, patchy_db=0.83, scrape_db=0.5)
    drag = rubbing(from_db(-2.5) * swivel_gains(body_db=-4), WORKTOP_TONE, slips_per_s=12000,
                   spread_db=-0.5, judder_db=0.6, hollow_db=-19, patchy_db=2.4, scrape_db=-0.1)
    strokes = stroke_gains()
    hands = rubbing(from_db(-1.02) * strokes, HAND_TONE, slips_per_s=9900,
                    spread_db=0.07, judder_db=0.76, hollow_db=-11.5, patchy_db=2, scrape_db=0.66)
    rub = slide + drag + edge_hiss() + hands
    rub += wrap_crinkle(strokes[2], level_db=-13.5)  # follows the hands' rasp
    thud = carton_thud()
    snapping = snaps(level_db=-0.5)
    foam = bumps(level_db=5.5) + creaks(level_db=-6) + squeaks(level_db=-4) + crunches(level_db=-8.5)
    to_walls = from_db(-12) * rub + from_db(-7.5) * snapping + from_db(-6) * foam
    echo = moving_echo(to_walls, turns_per_s=2.7)
    air = still_air(level_db=-65.5, drone_db=-85, drone_hz=84.3)
    mix = rub + thud + snapping + foam + echo + air
    return np.array([mix, mix])


def record(dry, top_hz=12000):
    """The level dips briefly as the slide ends, and treble above top_hz is cut throughout."""
    dip = from_db(np.interp(TIME, [1.459, 1.463, 1.474, 1.478], [-0.5, -17, -5, 0]))
    treble_cut = signal.firwin(401, top_hz, window=("kaiser", 8), fs=SR)
    return signal.oaconvolve(dry * dip, treble_cut[None], "same")


dry = scene()
out = record(dry)
persist_wave(out)
```